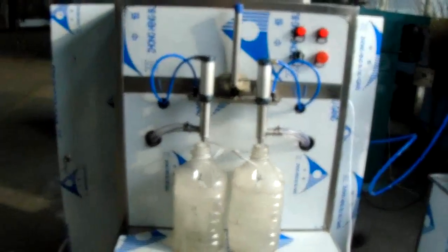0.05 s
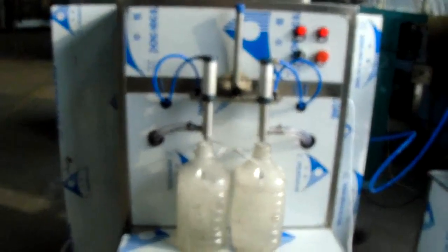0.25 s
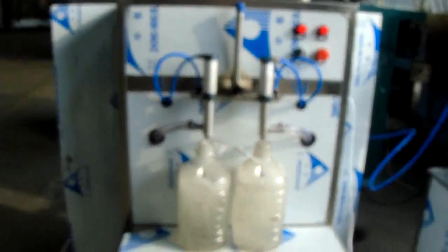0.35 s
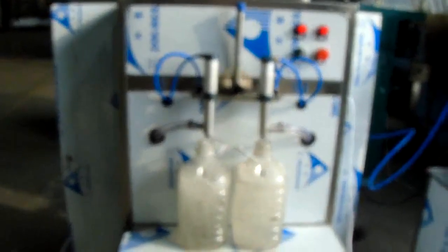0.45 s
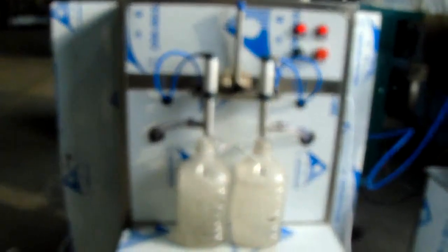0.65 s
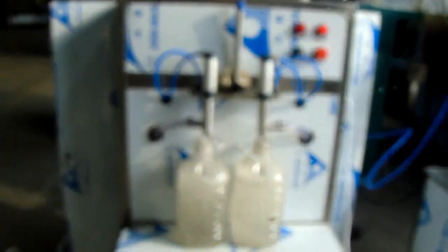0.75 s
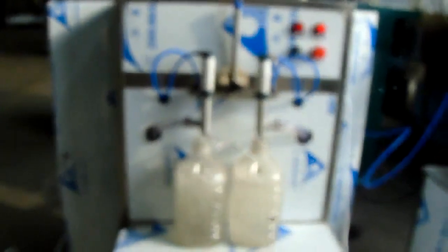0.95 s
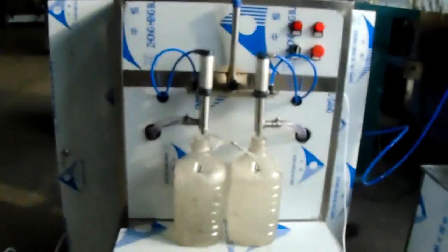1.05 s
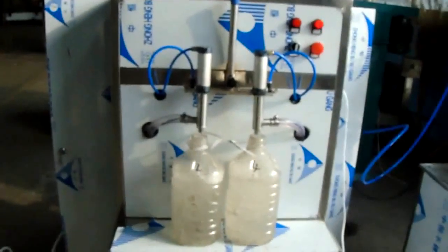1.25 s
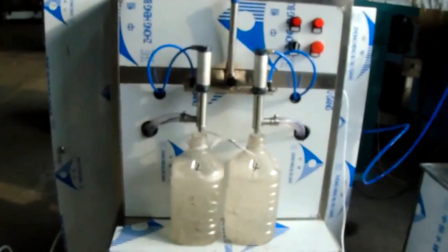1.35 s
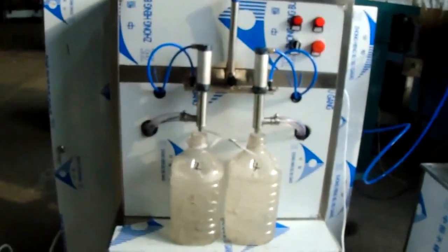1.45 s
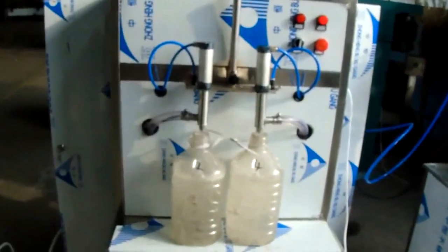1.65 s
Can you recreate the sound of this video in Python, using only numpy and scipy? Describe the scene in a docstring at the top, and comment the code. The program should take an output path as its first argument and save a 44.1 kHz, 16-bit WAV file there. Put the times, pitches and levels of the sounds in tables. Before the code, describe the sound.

Compressed air sputters briefly, then a valve knocks and vents a loud, bright burst; a softer burst follows. Steady leak hiss and low machinery rumble continue in an echoing workshop, heard close, identical in both ears.

```python
"""Pneumatic bottle filler in a workshop

Heard from close by, the same in both ears. Filtered noise makes the air that blows until a valve switches.
Two valves in turn knock (dull noise and ringing sines) and vent short, bright bursts of noise into the room;
a faint bleed comes just before the second. A leak hisses on with a thin, sinking sine whistle.
Behind them, low noise makes the machinery's rumble and bass; short sines make a small tap and low booms."""
import sys
import numpy as np
from scipy import signal
from scipy.fft import rfft, irfft
from scipy.io import wavfile
from scipy.ndimage import uniform_filter1d

SR = 44100
rng = np.random.default_rng(int(sys.argv[2]) if len(sys.argv) > 2 else 0)


def waveform_to_disk(signal):
    """Save audio, clipped to [-1, 1], as 16-bit WAV at the path in sys.argv[1]."""
    frames = np.transpose(np.atleast_2d(signal))
    scaled = np.clip(frames, -1, 1) * 32767
    samples = np.round(scaled).astype(np.int16)
    wavfile.write(sys.argv[1], SR, samples)


N = 74970  # length in samples
T = np.arange(N) / SR  # time in seconds


def undb(db):
    """Turn decibels into gain."""
    return 10 ** (np.asarray(db) / 20)


def curve(points):
    """Join (seconds, value) points by straight lines."""
    seconds, values = np.array(points).T
    return np.interp(T, seconds, values)


def colour(points, hz):
    """Read (Hz, value) points on a log-frequency axis."""
    point_hz, values = np.array(points).T
    return np.interp(np.log(hz + 1), np.log(point_hz), values)


def noise(spectrum, peaks=()):
    """Shape random noise with a broad colour and narrow boosts or cuts, then set its rms to 1."""
    hz = np.arange(N // 2 + 1) * SR / N
    db = colour(spectrum, hz)
    for peak_hz, width, peak_db in peaks:
        db = db + peak_db / (1 + (2 * (hz - peak_hz) / width) ** 2)
    shaped = irfft(rfft(rng.standard_normal(N)) * undb(db), N)
    return shaped / shaped.std()


def walk(rate):
    """Smooth random wandering of spread 1; a higher rate (per second) wanders faster."""
    width = max(int(SR / rate), 2)
    wander = rng.standard_normal(N)
    for _ in range(2):
        wander = uniform_filter1d(wander, width, mode="wrap")
    return wander / wander.std()


# Colour of the machinery rumble. Each row: frequency in Hz, relative level per Hz in dB.
RUMBLE_COLOUR = [(20, -9), (60, -8.5), (125, -10), (175, 1), (215, -3.5), (290, 3.5), (380, -9),
                 (500, -11.5), (900, -13.5), (3000, -25)]
# Loudness of the rumble. Each row: time in seconds, level in dB.
RUMBLE_LEVEL = [(0, -43.5), (.45, -47), (.9, -44), (1.15, -52), (1.7, -45)]
# Colour of the deep bass. Each row: frequency in Hz, relative level per Hz in dB.
BASS_COLOUR = [(20, -1.5), (45, -2.5), (80, 2), (130, -4.5), (250, -6.5), (1000, -57)]
# Loudness of the deep bass. Each row: time in seconds, level in dB.
BASS_LEVEL = [(0, -60), (.13, -65), (.35, -49.5), (.62, -48), (.9, -51), (1.2, -49.5), (1.42, -55.5),
              (1.7, -57)]
# A short small tap, then soft low booms.
# Each row: middle in seconds, half length in seconds, pitch in Hz, level in dB.
TAP_AND_BOOMS = [(0.139, 0.0073, 432, -34.5), (0.442, .04, 47, -37.5), (0.462, 0.015, 138, -38)]


def workshop():
    """Machinery's uneven rumble and deep bass, with one small tap, and low booms that swell and fade."""
    hums = [(179, 13, 4.7), (298, 22, 1.1)]  # Hz, width in Hz, boost in dB
    rumble = undb(curve(RUMBLE_LEVEL) + 1.0 * walk(18)) * noise(RUMBLE_COLOUR, hums)
    bass = undb(curve(BASS_LEVEL)) * noise(BASS_COLOUR)
    tap_and_booms = 0
    for middle, half_length, hz, db in TAP_AND_BOOMS:
        age = T - middle
        envelope = np.exp(-(age / half_length) ** 2)
        tap_and_booms = tap_and_booms + undb(db) * envelope * np.sin(2 * np.pi * hz * age)
    return rumble + bass + tap_and_booms


# Colour of the leak's hiss. Each row: frequency in Hz, relative level per Hz in dB.
LEAK_COLOUR = [(500, -15.5), (750, -13), (1080, -6), (1450, -9.5), (2000, -8), (2550, -5.5), (3500, -8.5),
               (5000, -7), (6500, -2.5), (8200, 1.5), (9600, -3), (10600, -10), (12000, -18),
               (14000, -15.5)]
# Resonances of the leak. Each row: frequency in Hz, width in Hz, boost in dB.
LEAK_RESONANCES = [(1040, 150, 1.5), (3060, 170, 2), (3920, 260, 1.5), (5500, 99, 3), (6400, 110, 3.5),
                   (8830, 220, 0.5)]
# Loudness of the leak. Each row: time in seconds, level in dB.
LEAK_LEVEL = [(0, -32), (.46, -29.5), (.58, -32.5), (.8, -32.5), (.97, -32.5), (1.1, -32), (1.25, -33.5),
              (1.42, -34), (1.7, -32.5)]
LEAK_FLUTTER_DB = 0.45


def leak():
    """Escaping air hisses almost steadily, with a slight random flutter."""
    level_db = curve(LEAK_LEVEL) + LEAK_FLUTTER_DB * walk(30)
    return undb(level_db) * noise(LEAK_COLOUR, LEAK_RESONANCES)


# Sinking pitch of the whistle. Each row: time in seconds, frequency in Hz.
WHISTLE_PITCH = [(0, 13420), (.18, 12830), (.52, 11830), (.69, 11345), (.84, 10950), (1.12, 10240),
                 (1.35, 9735), (1.5, 9430), (1.7, 9030)]
# Loudness of the whistle. Each row: time in seconds, level in dB.
WHISTLE_LEVEL = [(0, -39), (.18, -42), (.24, -60), (.46, -58), (.55, -52), (.7, -38.5), (.84, -43),
                 (.89, -58), (1.07, -47), (1.17, -45), (1.32, -40.5), (1.45, -46.5), (1.7, -44)]
WHISTLE_WAVER = 0.00139  # random spread, as a share of the pitch


def whistle():
    """A thin sine tone sinks while its pitch and level waver."""
    hz = curve(WHISTLE_PITCH) * (1 + WHISTLE_WAVER * walk(370))
    tone = np.sin(2 * np.pi * np.cumsum(hz) / SR)
    level_db = curve(WHISTLE_LEVEL) + 1.7 * walk(60)
    return undb(level_db) * np.sqrt(2) * tone  # sqrt(2) gives the sine an rms of 1


# Colour of the blowing air. Each row: frequency in Hz, relative level per Hz in dB.
BLOW_COLOUR = [(100, -22), (250, -0.5), (480, -10.5), (720, -14), (1000, 2), (1350, -1.5), (2150, -6.5),
               (2500, 1), (3200, -3.5), (4000, -3), (4800, -9), (5800, -8.5), (6500, -1.5), (7200, -4.5),
               (9900, -2.5), (12000, -9.5), (14000, -16)]
# Resonances of the air passages. Each row: frequency in Hz, width in Hz, boost in dB.
AIR_PASSAGES = [(1010, 150, 1), (2640, 200, 3), (6400, 200, 5), (8450, 220, 1), (9960, 120, 1)]
BLOW_DB, BLOW_STOP_S, BLOW_RELEASE_S = -25, 0.211, 0.023
SPUTTER_MIDS_DB, SPUTTER_TREBLE_DB = 2.0, 0.8


def blowing():
    """Air sputters through the passages until the first valve shuts it off; mids and treble flutter apart."""
    flow = np.exp(-np.maximum(T - BLOW_STOP_S, 0) / BLOW_RELEASE_S)
    air = noise(BLOW_COLOUR, AIR_PASSAGES)
    low_pass = signal.butter(2, 1900, fs=SR, output="sos")
    mids = signal.sosfiltfilt(low_pass, air)
    treble = air - mids
    sputtering_mids = mids * undb(SPUTTER_MIDS_DB * walk(65))
    sputtering_treble = treble * undb(SPUTTER_TREBLE_DB * walk(66))
    return flow * undb(BLOW_DB) * (sputtering_mids + sputtering_treble)


# Valve strikes and rebounds. Each row: start in seconds, level in dB.
VALVE_KNOCKS = [(0.2024, -25), (0.2080, -34), (0.233, -41.5), (0.8492, -30.5), (0.855, -38)]
# Ringing tones of the cabinet. Each row: pitch in Hz, relative level in dB, seconds to fall by 60 dB.
CABINET_MODES = [(72, -5, .16), (128.5, -4, 0.21), (176, -9, 0.088), (250, -20, 0.047), (317, -1, 0.15),
                 (395.6, -0.5, 0.13), (510, -4.5, .06), (645, 0, .09)]
# Colour of the thud. Each row: frequency in Hz, relative level per Hz in dB.
THUD_COLOUR = [(25, -15), (70, -4), (250, 0), (450, -4.5), (700, -5), (1300, -21), (5000, -44)]
THUD_DB, THUD_S = 0.5, 0.011  # level relative to the knock, fading time


def knocks():
    """A valve strikes its stop and rebounds: a dull noise thud and the cabinet's fading sine tones."""
    out = 0
    for start, db in VALVE_KNOCKS:
        age = np.maximum(T - start, 0)
        ring = 0
        for k, (hz, mode_db, t60) in enumerate(CABINET_MODES):
            sign = (-1) ** k  # every other tone starts the opposite way
            ring = ring + sign * undb(mode_db - 60 * age / t60) * np.sin(2 * np.pi * hz * age)
        thud = (age > 0) * np.exp(-age / THUD_S) * noise(THUD_COLOUR)
        out = out + undb(db) * (0.5 * ring + undb(THUD_DB) * thud)
    return out


# Valve exhausts. Each row: start in seconds, level in dB, share of the flow that starts at once,
# rise in seconds, hold in seconds, emptying in dB per second, level sent to the room in dB, burst name.
EXHAUST_BURSTS = [(0.196, -5, 0.16, 0.018, 0.011, 458, -0.8, "main"),
                  (0.800, -32.5, 0.44, 0.0042, .005, 600, -4, "bleed"),
                  (0.8464, -12.5, 0.25, 0.018, 0.0022, 402, 5, "return")]
# Colour of the exhaust jet. Each row: frequency in Hz, relative level per Hz in dB.
JET_COLOUR = [(60, -42), (300, -25), (1000, -37), (1600, -22), (2400, -14), (3200, -14), (4400, -9),
              (6200, -6.5), (8000, -2.5), (9700, -0.5), (11300, -3.5), (12100, -3), (14000, -11.5)]
# Fine spectral colour of each burst, by burst name: narrow boosts and cuts.
# Each row: frequency in Hz, width in Hz, boost (or cut if negative) in dB.
BURST_COLOURS = {"main": [(3880, 130, 5.5), (4200, 140, -4), (5500, 53, 3), (7270, 160, 6), (8200, 60, 3),
                 (8540, 27, 5), (8700, 110, 2), (8980, 35, 9), (13600, 600, 1)], "bleed": [(6500, 700, 17),
                 (13000, 3000, -10)], "return": [(1580, 98, 11.5), (2200, 190, 7), (2716, 69, 11),
                 (5270, 500, 3), (7530, 180, 7.5), (10270, 84, 7), (11400, 200, -1), (12300, 260, -1),
                 (12300, 250, -12), (14000, 900, -2)]}
JET_ROUGH_DB = 0.96  # turbulence of the jet


def exhausts():
    """Each valve opens, vents a turbulent jet of noise with its own uneven colour, and the pressure runs out."""
    direct, feed = 0, 0  # heard straight, and sent to the room
    for start, db, crack, rise, hold, fall, room_db, name in EXHAUST_BURSTS:
        age = T - start
        opening = (age > 0) * np.clip(crack + (1 - crack) * age / rise, 0, 1)
        emptying_db = fall * np.maximum(age - rise - hold, 0)
        pressure_db = db - emptying_db + JET_ROUGH_DB * walk(300)
        jet = opening * undb(pressure_db) * noise(JET_COLOUR, BURST_COLOURS[name])
        direct = direct + jet
        feed = feed + undb(room_db) * jet
    return direct, feed


# Bands of the room's echo. Each row: middle in Hz, seconds to fall by 60 dB, level in dB.
ROOM_BANDS = [(200, 0.17, -13), (1500, 0.61, -9.5), (3980, 1, -8.5), (8500, .85, -6.5), (13100, 0.93, -8.5)]
ROOM_DELAY_S, EARLY_DB, EARLY_S = 0.012, -10.5, 0.019


def room(dry_sound):
    """Early reflections from the cabinet and floor, then a diffuse tail that dies by band."""
    hz = np.arange(N // 2 + 1) * SR / N
    white = rfft(rng.standard_normal(N))
    age = np.maximum(T - ROOM_DELAY_S, 0)
    early = rng.standard_normal(N) * np.exp(-T / EARLY_S)
    early = early * np.sqrt(2 / (EARLY_S * SR))  # brings its energy to about 1
    response = undb(EARLY_DB) * early
    middles = np.array(ROOM_BANDS)[:, 0]
    # Each band is full at its own middle and fades to nothing at its neighbours' middles.
    for (_, t60, db), weights in zip(ROOM_BANDS, np.eye(len(ROOM_BANDS))):
        band = irfft(white * colour(np.c_[middles, weights], hz), N)
        decay = (age > 0) * np.exp(-np.log(1000) * age / t60)
        response = response + undb(db) * band * decay / np.linalg.norm(decay)
    return signal.fftconvolve(dry_sound, response)[:N]


def scene():
    """Valves echo in the room over the steady air and rumble, the same in both ears."""
    background = workshop() + leak() + whistle() + blowing()
    strikes = knocks()
    jets, feed = exhausts()
    mono = background + strikes + jets + room(feed + strikes)
    return np.array([mono, mono])


CEILING = 0.95  # tallest peak allowed before the last filter
TOP_HZ = 14170  # highest frequency kept


def record(dry):
    """Cut the top, clip the tallest peaks, then cut the top again."""
    top_cut = signal.ellip(12, 0.2, 80, TOP_HZ, fs=SR, output="sos")
    clipped = np.clip(signal.sosfiltfilt(top_cut, dry), -CEILING, CEILING)
    return signal.sosfiltfilt(top_cut, clipped)


dry = scene()
out = record(dry)
waveform_to_disk(out)
```